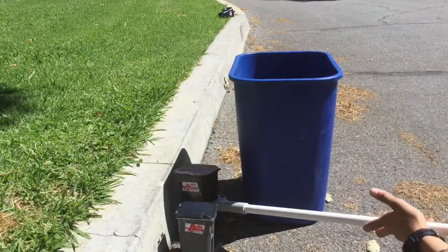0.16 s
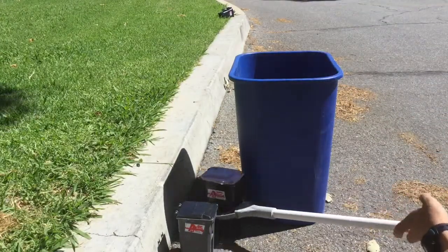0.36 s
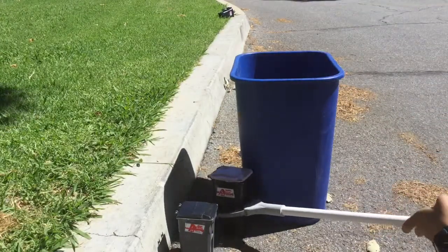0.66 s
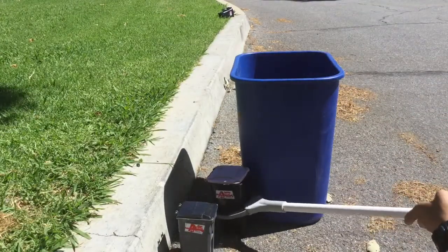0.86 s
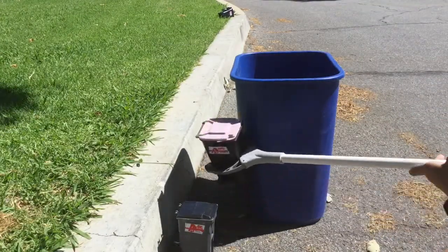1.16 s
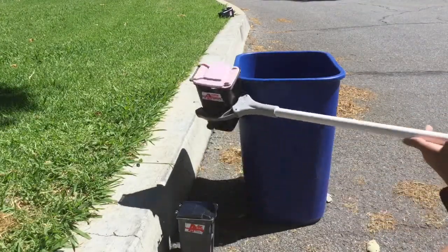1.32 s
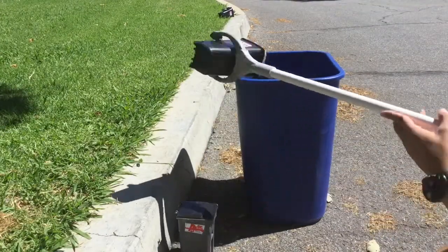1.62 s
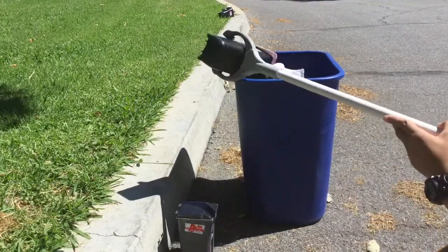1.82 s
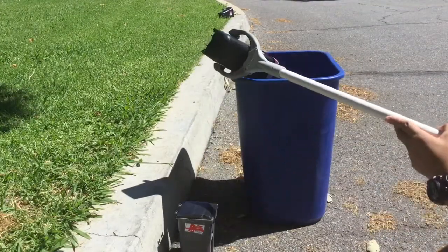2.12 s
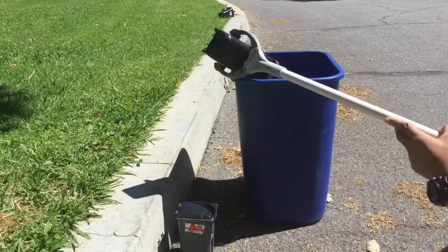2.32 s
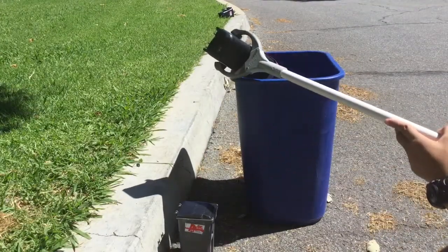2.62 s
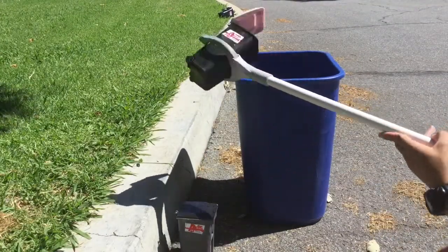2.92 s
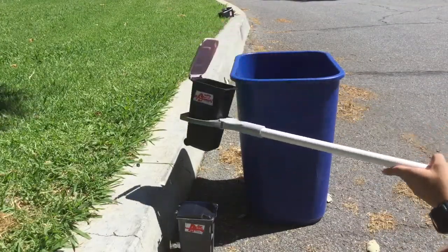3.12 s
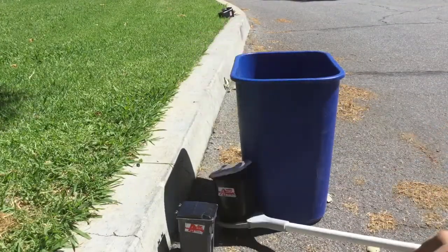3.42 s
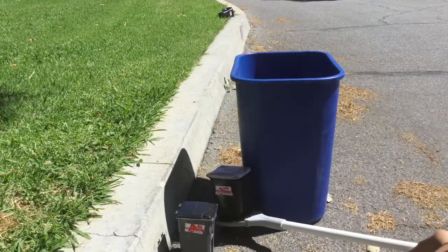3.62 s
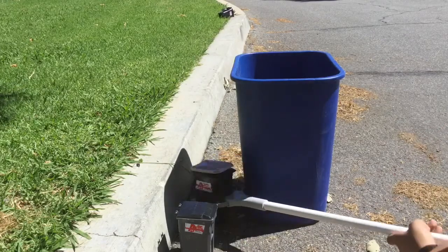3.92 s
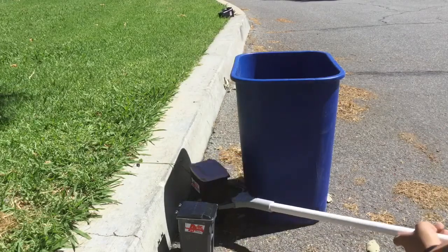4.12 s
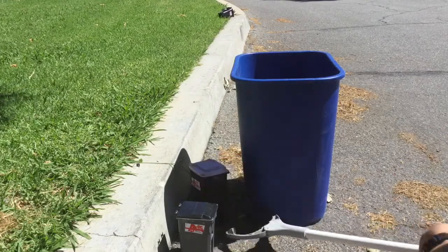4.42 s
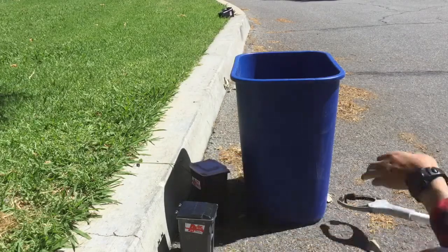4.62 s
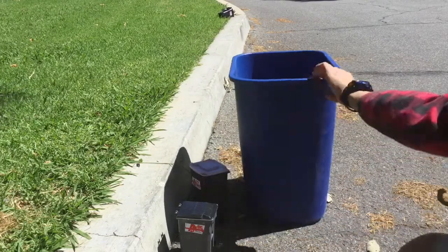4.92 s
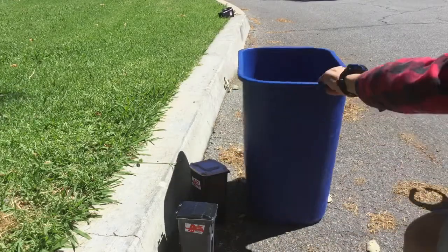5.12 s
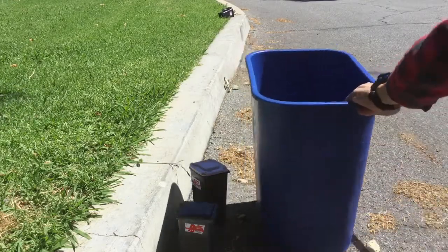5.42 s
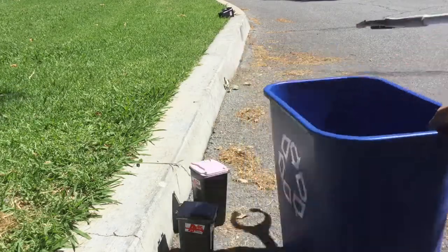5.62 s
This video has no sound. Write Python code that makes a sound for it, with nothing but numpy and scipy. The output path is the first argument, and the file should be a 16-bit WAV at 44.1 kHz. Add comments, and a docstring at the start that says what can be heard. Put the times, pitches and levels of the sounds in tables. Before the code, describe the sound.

A grabber handles a toy-sized plastic bin near the microphone: a quick cluster of hollow knocks, faint jaw squeaks, papery lid taps, clacks against a larger plastic bin. After a near-quiet second, the lid snaps shut and chatters, and the toy thumps and rattles onto the road. Then a big hollow bin booms and scrapes off across grit. Low wind gusts and soft far traffic; dry open air, slight kerb echo.

```python
"""Toy bin and big bin on a quiet street

Close to the microphone, a plastic grabber pipe drags a toy bin over the asphalt, lifts it, tips it against
a big plastic bin and sets it down: the little lid slaps shut and the toy rattles. Then the big bin is dragged
away by hand. Knocks are noise bursts and decaying modes; rubs are random grains coloured by the plastic.
Wind buffets the microphone in short swinging eddies, and far traffic hums as steady coloured noise.
"""
import sys
import numpy as np
from scipy import signal
from scipy.fft import rfft, irfft
from scipy.io import wavfile
from scipy.ndimage import uniform_filter1d

SR = 44100
rng = np.random.default_rng(int(sys.argv[2]) if len(sys.argv) > 2 else 0)


def to_wav(s):
    """Save 16-bit WAV."""
    ch = np.atleast_2d(s).T  # columns
    pcm = np.round(np.clip(ch, -1, 1) * 32767)  # PCM
    wavfile.write(sys.argv[1], SR, pcm.astype(np.int16))


N = 254016
AGE = np.arange(SR // 4) / SR   # time since a contact [s]

# Levels in the tables are relative: the functions may trim them or balance the parts of a sound.

# far street noise, spectrum: (frequency [Hz], density [dB per Hz])
STREET = [(120, -30.5), (200, -0.5), (236, -5.5), (334, -6.5), (569, -16.5), (836, -11.5), (1270, -12),
          (2960, -30), (3690, -29.5), (7410, -40), (8580, -31), (10300, -47), (14300, -58), (16000, -91.5)]
# breeze over the microphone: (time [s], rumble level [dB])
BREEZE = [(0.0, -49), (0.39, -43.5), (0.68, -49), (0.81, -41.5), (1.74, -48.5), (4.04, -44), (4.56, -39.5),
          (4.69, -40), (4.92, -45.5), (5.2, -47)]
# low rumble of the breeze, spectrum: (frequency [Hz], density [dB per Hz])
RUMBLE = [(20, -50.5), (40, -8.5), (65, 3), (120, -0.5), (200, -5.5), (300, -13.5), (500, -36.5),
          (1200, -56)]
# gusts that hit the microphone, each a run of eddies:
# (start [s], length [s], level [dB], central shaking rate [Hz])
GUSTS = [(0.651, 0, -30.5, 233.6), (0.685, 0, -27.5, 409.4), (0.705, 0, -27, 273),
         (0.724, 0.0085, -19, 299.7), (0.748, 0.031, -21.5, 346), (0.817, 0, -18, 309.6),
         (0.829, 0, -20.5, 461), (0.861, 0, -25, 405), (0.872, 0, -21, 241), (0.995, 0, -35.5, 229),
         (1.178, 0, -36.5, 127.4), (1.24, 0.036, -36.5, 209), (1.391, 0, -27.5, 201.8),
         (1.441, 0, -29, 170), (1.488, 0.028, -28, 211.4), (1.832, 0.0017, -30, 160.7),
         (3.438, 0.024, -29, 262.8), (3.687, 0.0084, -33, 163), (4.044, 0.011, -31, 246),
         (4.131, 0, -31, 198.5), (4.173, 0.046, -27.5, 299.5), (4.265, 0.000069, -32, 258.5),
         (4.301, 0.0053, -22, 268.5), (4.38, 0, -25, 398.4), (4.391, 0, -19.5, 229.2),
         (4.417, 0.023, -28.5, 272.4), (4.484, 0, -25, 211), (4.518, 0.048, -24.5, 271.8),
         (4.609, 0, -24, 336), (4.646, 0.001, -22, 239.5), (4.674, 0.0065, -24.5, 237.7),
         (4.69, 0.01, -18, 420.4), (4.739, 0.0027, -30.5, 320), (4.759, 0.01, -18, 332),
         (4.784, 0.00045, -27.5, 445), (4.812, 0.032, -26, 241.4)]
# turbulence round an eddy shaking at 300 Hz, spectrum: (frequency [Hz], density [dB per Hz])
SWIRL = [(40, -49), (100, -3), (200, 7.5), (350, -0.5), (550, -4), (800, -16), (1100, -30), (1600, -54),
         (3000, -44), (12000, -72)]
# dry clicks of the jaws and of grit: (time [s], level [dB], sparkle re click [dB])
CLICKS = [(0.741, -38.5, -11), (1.354, -29, -21), (1.368, -30, -17), (2.178, -45.5, -17), (2.901, -42, -8),
          (3.265, -24, -25), (3.4665, -35.5, -14), (3.514, -40, -20), (3.809, -31.5, 11), (3.827, -25, 4),
          (3.867, -40, -10), (3.884, -36.5, -16), (4.1762, -34.5, -10.5), (4.277, -35, -6.5),
          (4.6152, -37, -7), (5.081, -36, -14), (5.1877, -32, -8), (5.4202, -13, -7.5)]
# shell of the clicking parts, spectrum: (frequency [Hz], density [dB per Hz])
CLICK_SHELL = [(300, -0.5), (1000, -4.5), (2400, -6), (3400, -2.5), (5400, -4.5), (7000, -9), (8800, -3.5),
               (10500, -20.5), (16000, -31.5)]
# the jaws squeak as they close and as the toy twists in them:
# (start [s], length [s], start pitch [Hz], end pitch [Hz], level [dB])
SQUEAKS = [(0.954, 0.18, 4010, 3670, -67), (0.96, 0.11, 5150, 4980, -71), (1.07, 0.076, 5350, 5150, -63),
           (1.089, 0.114, 5300, 5000, -73), (1.11, 0.13, 3930, 3870, -67),
           (1.212, 0.045, 3830, 3700, -64.5), (1.268, 0.11, 4700, 4900, -66),
           (1.737, 0.023, 3425, 3350, -43.5), (1.756, 0.019, 3380, 3290, -40.5),
           (1.79, 0.08, 3540, 3480, -63), (1.795, 0.084, 6550, 6020, -62.5)]
# the empty jaws scuff the ground: (start [s], length [s], level [dB], resonance [Hz])
JAW_SCUFFS = [(3.732, 0.036, -65, 5100), (4.419, 0.002, -49.5, 4067), (4.443, 0.014, -53.5, 3400),
              (4.493, 0.0017, -51.5, 3920), (4.521, 0.002, -56, 3430), (4.526, 0.0027, -60, 4950)]
# tips of the jaws, spectrum: (frequency [Hz], density [dB per Hz])
JAW_TIPS = [(400, -17), (1800, 7.5), (2500, -1), (3600, 3.5), (5200, -0.5), (7000, -9), (9000, -6),
            (10500, -29), (16000, -36)]
# blows on the big bin: (time [s], crack [dB], boom [dB], top of the contact [Hz])
BIN_BLOWS = [(1.9986, -27.5, -46, 11200), (2.0147, -21, -35, 7040), (2.028, -36, -25, 3020),
             (2.0683, -32.5, -27, 1010), (2.09, -59, -38, 2000), (2.215, -59, -33, 3005),
             (5.086, -57, -30.5, 5030), (5.264, -67, -27, 3000), (5.31, -49, -29.5, 3020),
             (5.4172, -31.5, -38, 5000), (5.501, -30.5, -15.5, 1980), (5.589, -41, -18.5, 2000),
             (5.61, -37, -19, 2000)]
# walls of the big bin when left to ring: (frequency [Hz], level [dB], t60 [s])
BIN_MODES = [(156.13, -24.5, 0.55), (205.24, -5, 0.18), (234.5, 9, 0.081), (272, -12, 0.06),
             (340, -32, 0.05), (625, -26, 0.11), (704, -24, 0.09), (774, -23, 0.09)]
# rim of the big bin: (frequency [Hz], level [dB], t60 [s])
RIM_MODES = [(3280, -8, 0.09), (3470, 4, 0.16), (3830, -6, 0.079), (5500, -2, 0.07)]
# shell of the big bin, spectrum: (frequency [Hz], density [dB per Hz])
BIN_SHELL = [(200, 1), (700, 0.5), (1300, -5), (1800, 1), (2300, -0.5), (3300, 5), (4500, 3.5), (5600, 1),
             (7300, -11.5), (9000, -6), (10500, -17), (16000, -11)]
# grit under the big bin, spectrum: (frequency [Hz], density [dB per Hz])
GRIT = [(240, -25), (450, -10.5), (570, 5.5), (626, 0.5), (777, -6), (900, -1), (1180, -8), (1960, -7.5),
        (2630, -15.5), (3690, -16), (7630, -23.5), (8500, -16.5), (10500, -31.5), (16000, -61)]
# stones that the foot of the big bin trips over: (time [s], level [dB])
STONES = [(5.364, -41.5), (5.4763, -33.5), (5.491, -29.5), (5.5708, -32.5), (5.634, -37), (5.6675, -34.5),
          (5.7174, -29.5), (5.753, -30)]
# sound of those stones, spectrum: (frequency [Hz], density [dB per Hz])
STONE_SHELL = [(300, -8.5), (750, 7.5), (1300, -1.5), (2000, -5), (2800, -8), (3600, -12.5), (7000, -14),
               (8800, -9), (10500, -24), (16000, -42)]
# the toy slides on asphalt and in the jaws:
# (start [s], length [s], rub level [dB], share that reaches the hollow [dB])
TOY_SLIDES = [(0.251, 0.14, -39.5, -6.5), (0.403, 0.052, -45.5, 1), (1.03, 0.19, -62, -16),
              (1.276, 0.057, -58, -19), (1.376, 0.03, -57, 19), (1.522, 0.05, -57, -1),
              (1.649, 0.061, -53, -6), (1.737, 0.037, -45.5, -14), (1.79, 0.027, -52.5, -13),
              (3.338, 0.077, -54, 6), (3.922, 0.093, -57.5, 13.5), (4.0, 0.11, -60, 12.5)]
# flexing walls of the sliding toy, spectrum: (frequency [Hz], density [dB per Hz])
TOY_WALLS = [(150, -16.5), (260, 0.5), (370, 6.5), (470, -14), (600, 0), (850, -5), (1150, -20.5),
             (3000, -43.5), (12000, -67.5)]
# shell of the toy, spectrum: (frequency [Hz], density [dB per Hz])
TOY_SHELL = [(200, 3.5), (700, 14), (1250, 0.5), (1900, 2.5), (2600, -5), (3400, 0.5), (4600, -3),
             (5700, -3), (7200, -7.5), (9000, -3.5), (10500, -17), (16000, -29)]
# hollow of the toy when left to ring: (frequency [Hz], level [dB], t60 [s])
TOY_MODES = [(288, -7.5, 0.09), (346.4, 2.5, 0.08), (397.5, -1.5, 0.07), (554, 0, 0.07),
             (590.3, 4.5, 0.079), (682.5, 1.5, 0.071), (806, -4.5, 0.05), (880, -3.5, 0.075)]
# knocks on the toy: (time [s], crack [dB], thud [dB], hollow ring [dB],
# favoured mode [Hz], sparkle re crack [dB])
TOY_KNOCKS = [(0.2157, -34.5, -33, -34, 590, -26), (0.2356, -27.5, -40, -35, 660, -14),
              (0.2505, -36, -39, -42, 620, -22), (0.2615, -29, -40, -36, 600, -14),
              (0.2764, -28, -35, -36, 603, -15), (0.2821, -22, -31, -33, 710, -15),
              (0.2866, -26, -28.5, -28.5, 490, -17), (0.3215, -26, -27, -39, 790, -13),
              (0.3435, -27, -45, -40, 604, -13), (0.3592, -20, -35, -48, 647, -19),
              (0.3684, -28, -26, -36, 600, -21), (0.394, -28, -34, -27.5, 770, -18),
              (0.4281, -22, -30, -37, 650, 3), (0.4344, -28.5, -21.5, -27.5, 670, -22),
              (0.4607, -24.5, -28, -32, 597, -17), (0.4644, -38, -28, -26, 604, -15),
              (0.477, -31.5, -29, -36, 700, -18), (0.4946, -33.5, -31, -38, 604, -6.5),
              (3.3784, -28.5, -33, -31, 445, -14), (3.9232, -29, -22, -24, 452, -12),
              (3.929, -22, -43, -28.5, 604, -5), (3.9514, -20.5, -42, -33, 600, -13),
              (3.959, -32, -47, -31.5, 600, -14), (3.99, -27, -18, -30.5, 530, -17),
              (4.0118, -25.5, -24.5, -40, 593.5, -17), (4.0675, -30, -37, -32, 626, -5.5)]
# the toy lands on its base: (time [s], crack [dB], sparkle re crack [dB],
# thud [dB], thud pitch [Hz], ping [dB], ping pitch [Hz])
TOY_LANDINGS = [(3.4533, -29, -7, -18.5, 233, -47.5, 3080), (3.9099, -16.5, -6, -17, 279, -31, 3800)]
# the open lid taps while the toy is tipped:
# (time [s], clack [dB], favoured frequency [Hz], ring of the air [dB])
LID_TAPS = [(1.5175, -41.5, 2530, -40), (1.570, -42.5, 1310, -36.5), (1.640, -41, 1900, -37.5),
            (1.666, -32, 2110, -45), (1.681, -44, 3750, -43), (1.696, -50, 2550, -45),
            (1.719, -46, 1250, -39), (1.7395, -37, 2700, -34.5), (1.7629, -37, 1600, -41),
            (1.768, -37, 2650, -47), (1.7785, -38.5, 1550, -32.5), (1.806, -40, 2650, -35)]
# air in the open box: (frequency [Hz], level [dB], t60 [s])
OPEN_BOX_MODES = [(661, -10, 0.053), (694.5, 1, 0.034), (730, -8, 0.019)]
# the lid slaps shut and chatters: (time [s], crack [dB], ring of the box [dB])
LID_BOUNCES = [(3.3175, -16.5, -12), (3.3222, -15.5, -21), (3.3255, -29.5, -20.5), (3.3315, -25, -20.5),
               (3.3375, -30.5, -32), (3.344, -36.5, -43.5)]
# box closed by its lid: (frequency [Hz], level [dB], t60 [s])
LID_MODES = [(244, -23, 0.39), (398.5, -25, 0.1), (424, 3.5, 0.065), (465.5, 5, 0.053), (571.4, 0.5, 0.072),
             (681, -5, 0.067), (737, 2.5, 0.059), (788, -2, 0.077), (892, -6, 0.0502)]
# high modes of the stiff lid: (frequency [Hz], level [dB], t60 [s])
LID_PINGS = [(1370, 8.5, 0.06), (3337, -1.5, 0.042), (3340, 5, 0.068), (3855, 5.5, 0.026), (4100, 2, 0.038),
             (4525, 0, .05), (5090, 5.5, 0.059), (5761, -1, 0.0523), (5810, 9.5, 0.05), (8540, -1.5, 0.066)]
# thin lid, spectrum: (frequency [Hz], density [dB per Hz])
LID_SHELL = [(200, -1.5), (900, 7.5), (1300, -9.5), (2700, -11), (3400, 3.5), (4100, -3), (4600, -4),
             (5700, -1.5), (7000, -8.5), (9000, -5.5), (10500, -21.5), (16000, -37.5)]
# rubbing hinge of the lid, spectrum: (frequency [Hz], density [dB per Hz])
HINGE_RUB = [(300, 8), (1000, -2), (2600, -8.5), (3700, 6), (5000, -2), (6500, -4), (9000, -6),
             (10500, -22.5), (16000, -31.5)]

STREET_DB = -53.5
EDDY_GAP_S = 0.016   # about the time between the eddies of a gust
STRAY_EDDY_DB, STRAY_EDDY_HZ = 9.5, 159.5   # lone eddies: level re the breeze table, central shaking rate
GRIP_DAMPING = 0.53   # share of the ring time left while a contact presses on the wall
KNOCK_T60_S = 0.014   # decay of the toy shell's crack
MODE_FOCUS_DB = 21   # loss per octave away from the favoured mode
WALL_LAG_S = 0.0018   # the wall flexes just after the crack
AIR_LAG_S = 0.00289   # the air answers after the clack
LID_SWING_S, LID_SWING_DB = 3.2645, -38.5   # the lid starts to fall shut
# a rub swells by SWELL_DB over a share of its length before it is under way, holds, and dies steadily
SWELL_DB, SWELL_SHARE, RUB_FALL_DB_PER_S = 30, 0.56, 750
# the big bin is tugged, gathers speed and then slides on, slowly louder
DRAG_START_S, DRAG_RISE_S = 5.222, 0.26
DRAG_START_DB, DRAG_DB, DRAG_GAIN_DB_PER_S = -62, -40, 18.5
GRIT_UNEVEN_DB = 3   # the grit lies in patches
CUTOFF_HZ = 16300   # top of the sound


def from_db(db):
    """Decibels to gain."""
    return 10 ** (np.asarray(db) / 20)


def rms_one(x):
    """Scale to unit power."""
    return x / np.sqrt(np.mean(x ** 2) + 1e-20)


def peak_one(x):
    """Scale so that the loudest 4 ms have unit power."""
    return x / np.sqrt(uniform_filter1d(x ** 2, size=176).max() + 1e-20)


def fade(t60):
    """Exponential decay after a contact, by 60 dB in t60 seconds."""
    return np.exp(-np.log(1000) * AGE / max(t60, 1e-3))


def in_time(rows):
    """Columns of a curve at every sample."""
    s, *columns = np.transpose(rows)
    return [np.interp(np.arange(N) / SR, s, column) for column in columns]


def add(out, s, sound):
    """Mix a sound in from time s."""
    at = max(round(s * SR), 0)
    out[at:at + len(sound)] += sound[:N - at]


def drift(rate):
    """Slow chance of unit power, with this many new values per second."""
    knots = rng.standard_normal(int(N / SR * rate) + 2)
    return rms_one(np.interp(np.arange(N) / SR * rate, np.arange(len(knots)), knots))


def colour(x, spectrum, size=2048):
    """Causal (minimum-phase) filter with the given spectrum."""
    hz, db = np.transpose(spectrum)
    grid = np.maximum(np.arange(size // 2 + 1) * SR / size, 1)
    cepstrum = irfft(np.log(from_db(np.interp(np.log(grid), np.log(hz), db))))
    # folding the cepstrum forward in time gives minimum phase
    cepstrum[1:size // 2] *= 2
    cepstrum[size // 2 + 1:] = 0
    return signal.oaconvolve(x, irfft(np.exp(rfft(cepstrum))))[:len(x)]


def emphasise(x, hz, lift_db, q):
    """Lift one resonance out of a sound."""
    return x + (from_db(lift_db) - 1) * signal.lfilter(*signal.iirpeak(hz, q, fs=SR), x)


def patches(patchy_db):
    """Each point of contact favours other modes: a random spectrum."""
    hz = np.geomspace(500, 12000, num=26)
    return np.transpose([hz, patchy_db * np.clip(rng.standard_normal(len(hz)), -2, 2)])


def ring(modes, rise_s, spread_db):
    """One blow starts all modes together, each with a strength of its own."""
    out = np.zeros(len(AGE))
    for hz, db, t60 in modes:
        strength = from_db(db + spread_db * rng.standard_normal())
        out += strength * fade(t60) * np.sin(2 * np.pi * hz * AGE)
    return peak_one(out * (1 - np.exp(-AGE / rise_s)))


def crack(shell, t60, sparkle_db, tail_db, tail_t60, rise_s):
    """Crowded high modes of a hard shell: a sharp burst, a faint even tail, and more or less top."""
    attack = rng.standard_normal(len(AGE)) * (1 - np.exp(-(AGE / rise_s) ** 2))
    direct = colour(attack * fade(t60), patches(patchy_db=3.5))
    burst = colour(direct + from_db(tail_db) * attack * fade(tail_t60), shell)
    # steer the share of energy above 7 kHz towards the sparkle asked for
    top = signal.sosfilt(signal.butter(2, 7000, "high", fs=SR, output="sos"), burst)
    top_db = 10 * np.log10(np.sum(top ** 2) / np.sum(burst ** 2))
    lift_db = np.clip(sparkle_db - top_db, -12, 12)
    return peak_one(colour(burst, [(5000, 0), (8500, lift_db), (11000, 0.94 * lift_db)], size=256))


def thud(hz, t60):
    """A flexing wall gives a few quickly dying cycles."""
    return peak_one(np.sin(2 * np.pi * hz * AGE) * fade(t60) * (1 - np.exp(-AGE * hz)))


def grains(per_s, size_db, smooth_db):
    """Rough ground plucks the plastic at random instants, over a smooth rub."""
    sizes = from_db(size_db * np.minimum(rng.exponential(1, N), 4)) * rng.choice([-1, 1], N)
    plucks = rms_one(sizes * (rng.random(N) < per_s / SR))
    return rms_one(plucks + from_db(smooth_db) * rng.standard_normal(N))


def resonate(force, modes):
    """A steady force keeps the modes of a body ringing."""
    response = sum(from_db(db) * fade(t60) * np.cos(2 * np.pi * hz * AGE) for hz, db, t60 in modes)
    return rms_one(signal.fftconvolve(force, response)[:N])


def scratches(start, end, shell, per_s, size_db, t60, patchy_db):
    """Grit catches under a sliding bin, each grain with a colour of its own; about unit power."""
    out = np.zeros(N)
    for s in np.arange(start, end, 1 / per_s):
        burst = (rng.standard_normal(len(AGE)) * fade(t60))[:SR // 20]
        burst = colour(colour(burst, shell, size=1024), patches(patchy_db), size=1024)
        unit_power = np.sqrt(SR / per_s / np.sum(burst ** 2))
        size = from_db(size_db * rng.uniform(-1.0, 1))
        add(out, s - rng.random() / per_s, size * unit_power * burst)
    return out


def stroke(start, length):
    """Gain of one rub: swell, hold, release."""
    t = np.arange(N) / SR - start
    early, late = np.maximum(-t, 0), np.maximum(t - length, 0)
    gain_db = -SWELL_DB * early / (SWELL_SHARE * length) - RUB_FALL_DB_PER_S * late
    return from_db(np.maximum(gain_db, -200))


def street():
    """Far traffic and leaves blend into coloured noise that hardly moves in level."""
    noise = rms_one(colour(rng.standard_normal(N), STREET))
    return from_db(STREET_DB + 0.18 * drift(1.1)) * noise


def eddies(breeze_db, count=30):
    """Rows of (s, dB, Hz): lone eddies ride on the breeze, and each gust sheds a quick run of its own."""
    lone = (np.arange(count) + rng.random(count)) / count * N
    rows = [(at / SR, breeze_db[int(at)] + STRAY_EDDY_DB, STRAY_EDDY_HZ) for at in lone]
    for start, length, db, hz in GUSTS:
        run = np.linspace(start, start + length, round(abs(length) / EDDY_GAP_S) + 1)
        rows += [(s, db, hz) for s in run]
    s, db, hz = np.transpose(rows)
    return zip(s, db, hz * 2 ** (0.072 * rng.standard_normal(len(rows))))


def wind(cycles=0.62, wander=0.298, skew=0.13, swirl_db=-6, swirl_s=0.0054):
    """A lumpy rumble, and eddies that each shake the diaphragm for about two uneven, lopsided cycles."""
    breeze_db, = in_time(BREEZE)
    lumpy = rng.standard_normal(N) * from_db(4.3 * drift(35))
    out = from_db(breeze_db + 1.5) * rms_one(colour(lumpy, RUMBLE))
    t = np.arange(-SR // 25, SR // 25) / SR
    for s, db, hz in eddies(breeze_db):
        unevenness = np.interp(t * hz, np.arange(-8, 9), rng.uniform(-1.4, 1.1, 17))
        turns = np.cumsum(hz * np.exp(wander * unevenness)) / SR + rng.random()
        shake = np.exp(2j * np.pi * turns) / np.cosh(t * hz / cycles)
        lopsided = peak_one(np.real(shake + skew * shake ** 2))
        # faster eddies carry finer turbulence
        finer = np.array(SWIRL) * [np.sqrt(hz / 300), 1]
        swirl = peak_one(colour(rng.standard_normal(len(t)), finer) / np.cosh(t / swirl_s))
        add(out, s + t[0], from_db(db) * peak_one(lopsided + from_db(swirl_db) * swirl))
    return out


def clicks():
    """Small hard contacts with no hollow behind them."""
    out = np.zeros(N)
    for s, db, sparkle_db in CLICKS:
        click = crack(CLICK_SHELL, t60=0.0052, sparkle_db=sparkle_db + 4.0,
                      tail_db=-22.5, tail_t60=0.078, rise_s=0.00058)
        add(out, s, from_db(db - 10.5) * click)
    return out


def jaws():
    """The grabber's hinge squeaks in thin, unsteady glides; its tips scuff the asphalt and resonate."""
    rub = colour(grains(per_s=3000, size_db=3, smooth_db=-3), JAW_TIPS)
    out = np.zeros(N)
    for s, length, db, hz in JAW_SCUFFS:
        out += from_db(db) * stroke(s, length) * rms_one(emphasise(rub, hz, lift_db=7, q=6.4))
    waver, flutter = 0.017 * drift(900), from_db(1.5 * drift(150))   # of pitch, of level
    for s, length, start_hz, end_hz, db in SQUEAKS:
        size, at = int(length * SR), int(s * SR)
        hz = np.linspace(start_hz, end_hz, size) * (1 + waver[at:at + size])
        glide = np.sin(2 * np.pi * np.cumsum(hz) / SR)
        add(out, s, from_db(db) * peak_one(np.hanning(size) * flutter[at:at + size] * glide))
    return out


def big_bin():
    """Blows crack and ring the rim and set the walls booming; soft contacts lose their top."""
    out = np.zeros(N)
    held_modes = [(hz, db, t60 * GRIP_DAMPING) for hz, db, t60 in BIN_MODES]
    for s, crack_db, boom_db, contact_hz in BIN_BLOWS:
        rim = crack(BIN_SHELL, t60=0.017, sparkle_db=-3, tail_db=-28.5, tail_t60=0.22, rise_s=0.0027)
        rim = rim + from_db(-18.5) * ring(RIM_MODES, rise_s=0.003, spread_db=2.0)
        softness = signal.butter(2, min(contact_hz, 15000), fs=SR, output="sos")
        add(out, s, from_db(crack_db) * peak_one(signal.sosfilt(softness, rim)))
        add(out, s, from_db(boom_db) * ring(held_modes, rise_s=0.02, spread_db=2.0))
    return out


def bin_drag():
    """The big bin gathers speed: grit scrapes under it, its foot trips over stones, its walls drone."""
    t = np.arange(N) / SR - DRAG_START_S
    gathering_db = DRAG_START_DB + (DRAG_DB - DRAG_START_DB) * t / DRAG_RISE_S
    sliding_db = DRAG_DB + DRAG_GAIN_DB_PER_S * (t - DRAG_RISE_S)
    scrape_db = np.minimum(gathering_db, sliding_db)

    force = grains(per_s=4000, size_db=3, smooth_db=-2)
    smooth = from_db(-6.5) * rms_one(colour(force, GRIT))
    grit = scratches(DRAG_START_S, N / SR, GRIT, per_s=360, size_db=5.5, t60=0.032, patchy_db=7)
    grit = from_db(-2.5 + GRIT_UNEVEN_DB * drift(45)) * grit
    drone = resonate(colour(force, [(100, -21), (200, -4)]), BIN_MODES)
    # the steady pull of the hand keeps the walls swinging evenly
    drone = rms_one(drone / np.sqrt(uniform_filter1d(drone ** 2, size=900) + 0.1))
    out = from_db(scrape_db) * (smooth + grit + from_db(4.0) * drone)
    for s, db in STONES:
        stone = crack(STONE_SHELL, t60=0.053, sparkle_db=-19, tail_db=-23, tail_t60=0.12, rise_s=0.001)
        add(out, s, from_db(db) * stone)
    return out


def toy_slide():
    """Friction excites the same shell and hollow as the knocks, but more softly."""
    rub = sum(from_db(db) * stroke(s, length) for s, length, db, _ in TOY_SLIDES)
    hollow = sum(from_db(db + share_db) * stroke(s, length) for s, length, db, share_db in TOY_SLIDES)
    force = grains(per_s=1800, size_db=8.5, smooth_db=1.5)
    # the catches end as the last slide gets under way
    catches = scratches(0, TOY_SLIDES[-1][0], TOY_SHELL, per_s=220, size_db=3.0, t60=0.015, patchy_db=1.5)
    shell = from_db(-8.0) * rms_one(colour(force, TOY_SHELL)) + from_db(-1.5) * catches
    shell = colour(shell, [(9000, -1.5), (12000, -14.5), (16000, -16)])
    walls = from_db(-1.5) * rms_one(colour(force, TOY_WALLS))
    ringing = resonate(colour(force, [(2500, -2.7), (12000, -21)]), TOY_MODES)
    return rub * (shell + walls) + from_db(-5.0) * hollow * ringing


def toy_knocks():
    """Each knock cracks the shell, flexes the wall and rings the modes near a favoured frequency."""
    out = np.zeros(N)
    for s, crack_db, thud_db, hollow_db, favoured_hz, sparkle_db in TOY_KNOCKS:
        shell = crack(TOY_SHELL, KNOCK_T60_S, sparkle_db + 1.0, tail_db=-22.5, tail_t60=0.13, rise_s=0.00057)
        shell = peak_one(emphasise(shell, hz=4380, lift_db=5, q=1.1))
        add(out, s, from_db(crack_db - 10) * shell)
        modes = []
        for hz, db, t60 in TOY_MODES:
            octaves_away = abs(np.log2(hz / favoured_hz))
            modes.append((hz, db - MODE_FOCUS_DB * octaves_away, t60 * GRIP_DAMPING))
        add(out, s, from_db(hollow_db) * ring(modes, rise_s=0.023, spread_db=6.0))
        wall = thud(hz=255 * np.exp(0.17 * rng.standard_normal()), t60=0.02)
        add(out, s + WALL_LAG_S, from_db(thud_db - 5.0) * wall)
    return out


def toy_landings():
    """The toy's base meets the road: a short crack, then the floor of the box flexes; a stiff corner pings."""
    out = np.zeros(N)
    for s, crack_db, sparkle_db, thud_db, thud_hz, ping_db, ping_hz in TOY_LANDINGS:
        shell = crack(TOY_SHELL, t60=0.014, sparkle_db=sparkle_db, tail_db=-25, tail_t60=0.08, rise_s=0.0028)
        add(out, s, from_db(crack_db) * shell)
        hollow = from_db(-12.5) * ring(TOY_MODES, rise_s=0.0017, spread_db=0.5)
        add(out, s + WALL_LAG_S, from_db(thud_db) * (thud(hz=thud_hz, t60=0.021) + hollow))
        corner = [(ping_hz, 0, 0.04), (ping_hz * 2.26, -11, 0.04)]
        add(out, s, from_db(ping_db) * ring(corner, rise_s=0.014, spread_db=1.5))
    return out


def lid_taps():
    """The hanging lid taps the big bin as the toy is tipped: a papery clack, then the air in the open box
    swells and rings."""
    out = np.zeros(N)
    for s, clack_db, clack_hz, air_db in LID_TAPS:
        shell = crack(TOY_SHELL, t60=0.028, sparkle_db=-16.5, tail_db=-22, tail_t60=0.18, rise_s=0.0013)
        add(out, s, from_db(clack_db) * peak_one(emphasise(shell, clack_hz, lift_db=8, q=3.7)))
        add(out, s + AIR_LAG_S, from_db(air_db) * ring(OPEN_BOX_MODES, rise_s=0.014, spread_db=2.0))
    return out


def lid():
    """The lid swings on its rubbing hinge, lands and chatters on the rim; every bounce rings the closed box."""
    t = np.arange(N) / SR
    friction = grains(per_s=3000, size_db=3, smooth_db=0)
    swinging = np.clip((t - LID_SWING_S) / 0.0046, 0, 1) * (t < LID_BOUNCES[0][0])
    out = from_db(LID_SWING_DB) * swinging * rms_one(colour(friction, HINGE_RUB))
    for s, crack_db, box_db in LID_BOUNCES:
        shell = crack(LID_SHELL, t60=0.05, sparkle_db=-9, tail_db=-25, tail_t60=0.24, rise_s=0.00013)
        pings = ring(LID_PINGS, rise_s=0.0004, spread_db=2)
        add(out, s, from_db(crack_db) * (shell + from_db(-12.0) * pings))
        add(out, s, from_db(box_db) * ring(LID_MODES, rise_s=0.0058, spread_db=0.5))
    return out


def off_the_kerb(x, delay_s=0.0027, echo_db=-11):
    """One early echo from the kerb."""
    return x + from_db(echo_db) * np.interp(np.arange(N) - delay_s * SR, np.arange(N), x, left=0)


def scene():
    """The plastic is close by in the open air, with one kerb echo; street and wind have none."""
    background = street() + wind()
    grabber = clicks() + jaws()
    large = big_bin() + bin_drag()
    toy = toy_slide() + toy_knocks() + toy_landings() + lid_taps() + lid()
    return (off_the_kerb(grabber + large + toy) + background)[None]


def record(dry):
    """At the microphone the deepest bass and the top are cut."""
    thinned = signal.sosfilt(signal.butter(2, 40, "high", fs=SR, output="sos"), dry)
    return signal.sosfilt(signal.ellip(10, 0.1, 90, CUTOFF_HZ, fs=SR, output="sos"), thinned)


dry = scene()
out = record(dry)
to_wav(out)
```